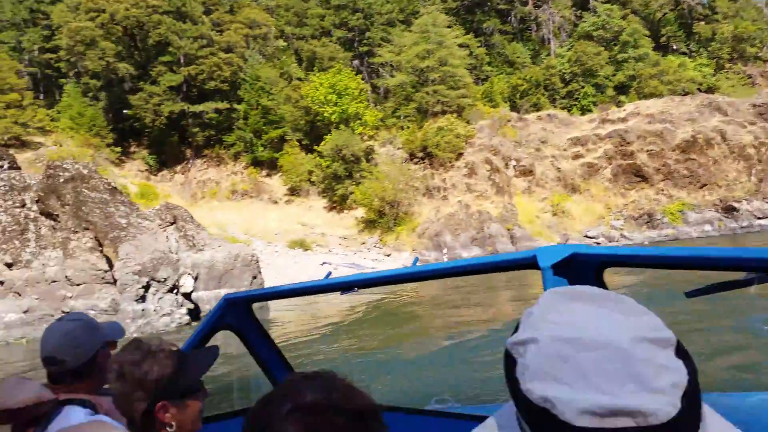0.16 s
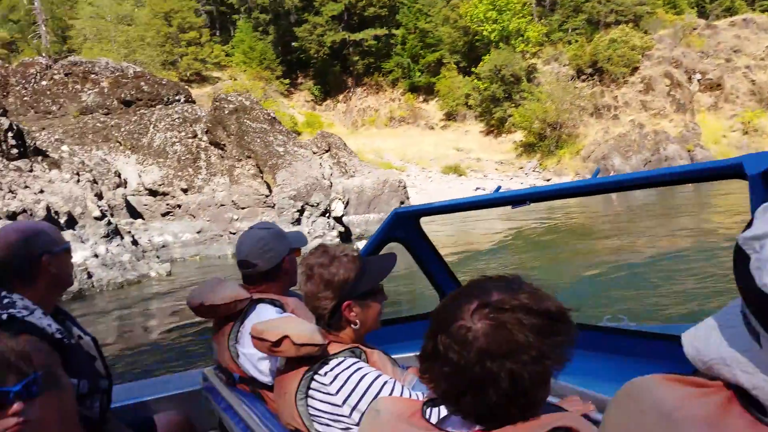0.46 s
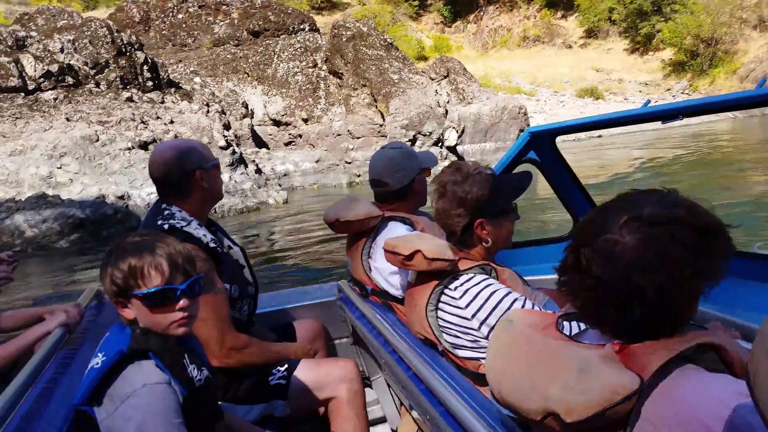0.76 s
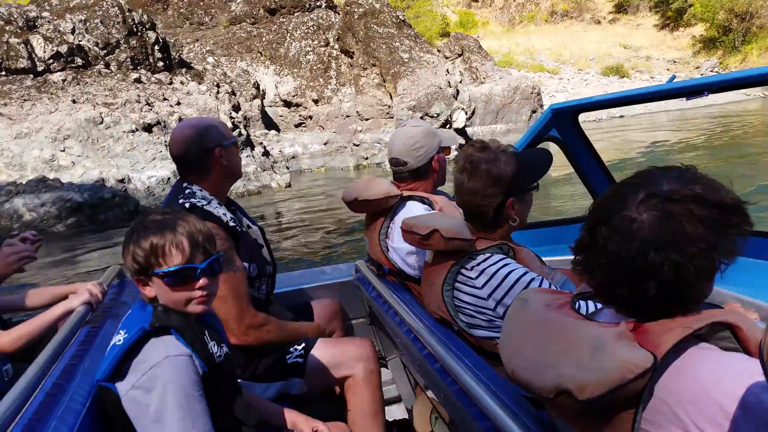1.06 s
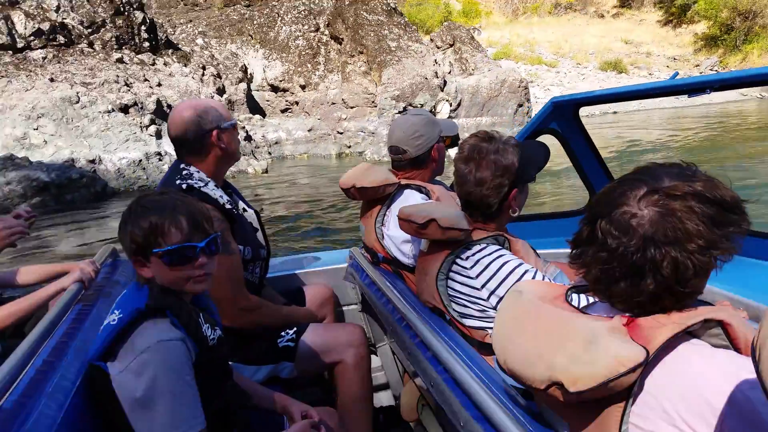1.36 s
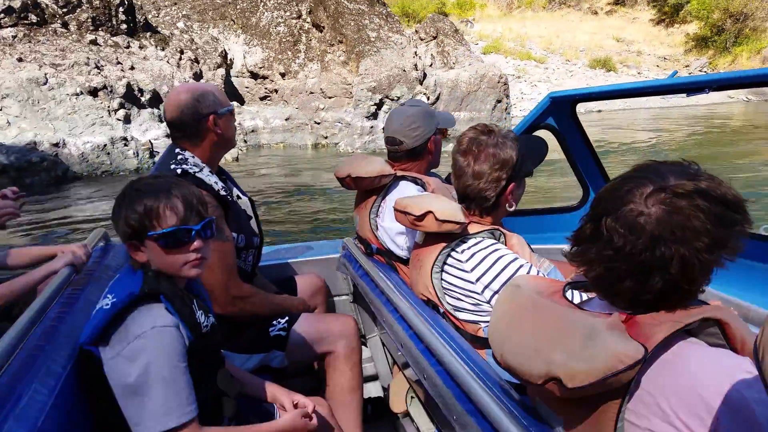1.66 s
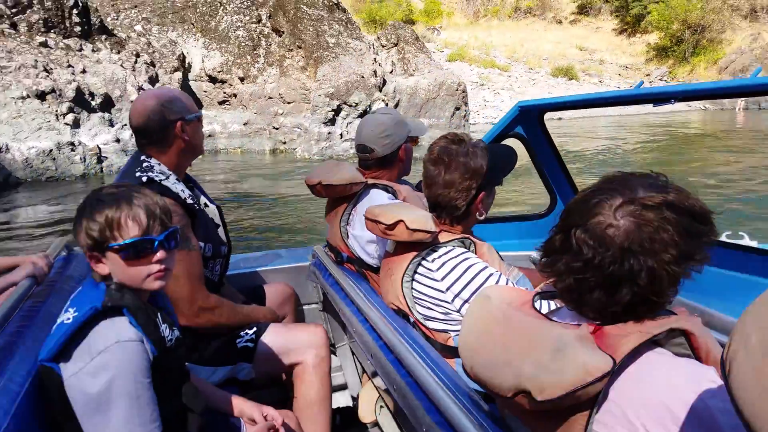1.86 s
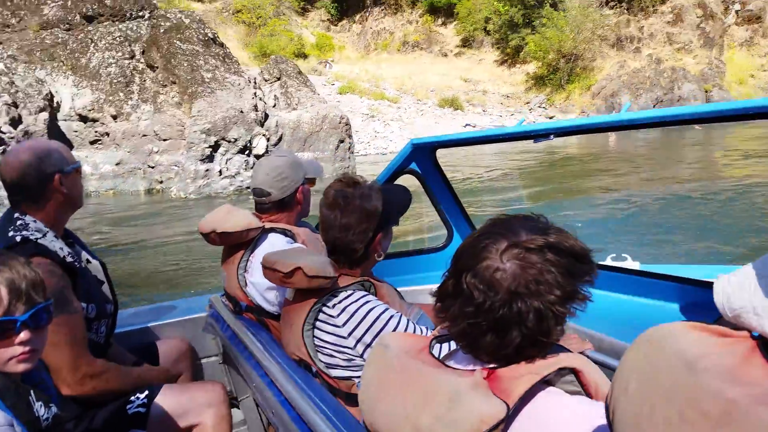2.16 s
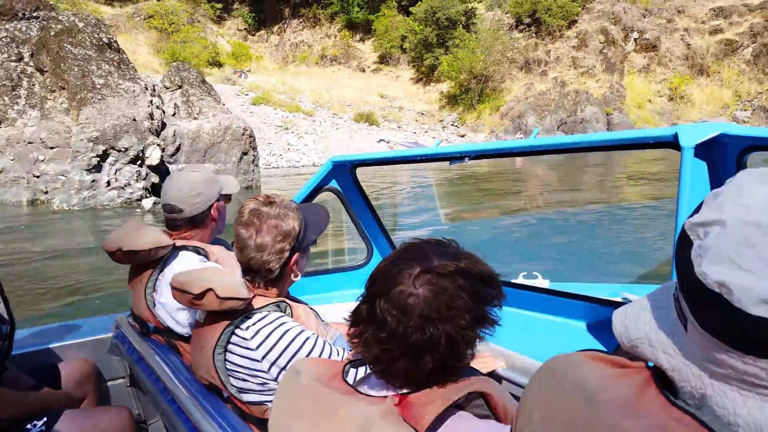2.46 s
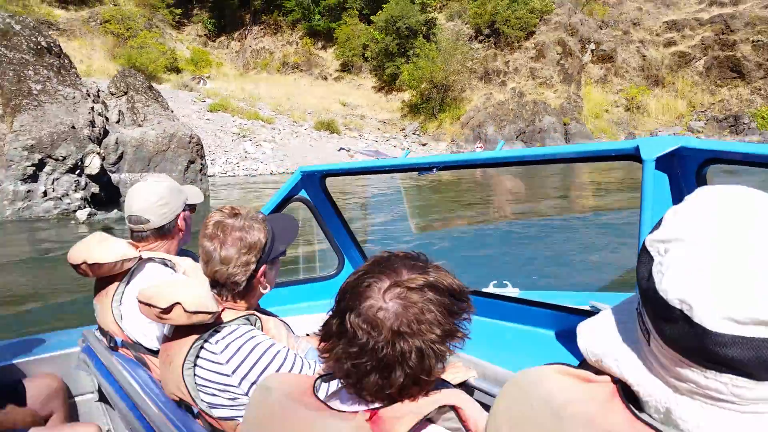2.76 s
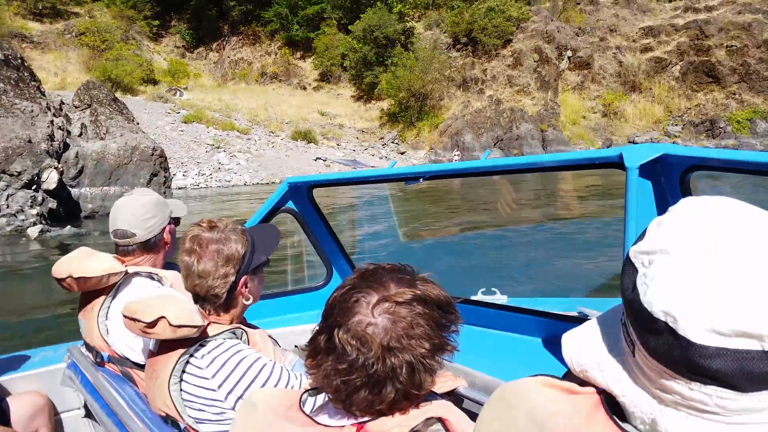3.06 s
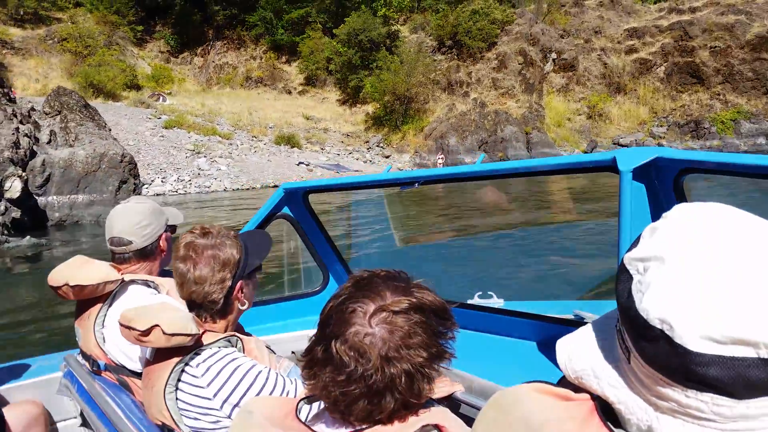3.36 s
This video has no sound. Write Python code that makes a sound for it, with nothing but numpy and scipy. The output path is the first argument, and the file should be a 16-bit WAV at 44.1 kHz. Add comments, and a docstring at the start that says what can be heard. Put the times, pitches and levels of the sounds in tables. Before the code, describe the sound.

A low, burbling boat engine drone runs throughout and creeps up in pitch. Beneath it, heard from on board, river water washes past and spray fizzes, softening gradually, while small waves splash lightly against the hull in the first half.

```python
"""A throbbing engine drone with rushing water and a fine fizz, heard on a jet boat going down a river.
Three eight-cylinder engines run at slightly different, slowly rising speeds, so their tones beat
against each other while uneven firings make the exhausts burble. Water rushes along the hull and
spray hisses, both easing off little by little, and a few small waves splash against the boat."""
import sys
import numpy as np
from scipy import signal
from scipy.fft import rfft, irfft
from scipy.io import wavfile

SR = 44100
rng = np.random.default_rng(int(sys.argv[2]) if len(sys.argv) > 2 else 0)


def dump_mix(stems):
    """Bounce the given channels to the path in sys.argv[1] as a 16-bit WAV at rate SR."""
    frames = np.atleast_2d(stems).T  # one column per channel
    limited = np.clip(frames, -1, 1)  # hard clip at full scale
    pcm = np.round(limited * 32767).astype(np.int16)
    wavfile.write(sys.argv[1], SR, pcm)


N = 154350
TIME = np.arange(N) / SR


def engines():
    """Three engines at nearly the same pitch drift in and out of step, which makes them throb."""
    # each engine's firing tone: t/s, f/Hz, relative level/dB
    fast = [(0.0, 123.0, -18), (0.35, 126.5, -17), (0.8, 126.9, -17), (1.1, 129.1, -16), (1.35, 131.1, -12),
            (1.6, 133.4, -17), (1.9, 133.7, -19), (2.2, 132.1, -20), (2.5, 133.5, -14), (2.8, 133.4, -14),
            (3.1, 134.1, -16), (3.5, 135.7, -14)]
    middle = [(0.0, 122.2, -23), (0.35, 121.3, -21), (0.8, 120.2, -22), (1.1, 121.9, -25),
              (1.35, 124.8, -23), (1.6, 126.9, -20), (1.9, 128.7, -18), (2.2, 128.9, -18),
              (2.5, 131.5, -20), (2.8, 130.3, -19), (3.1, 133.3, -21), (3.5, 134.7, -21)]
    slow = [(0.0, 114.4, -21), (0.35, 111.9, -23), (0.8, 111.8, -19), (1.1, 111.6, -18), (1.35, 113.4, -22),
            (1.6, 112.9, -20), (1.9, 112.2, -18), (2.2, 113.7, -20), (2.5, 114.0, -18), (2.8, 116.8, -17),
            (3.1, 118.5, -19), (3.5, 122.0, -20)]
    # tones at 3-7 (boom) and 9-20 (growl) times the cycle rate: relative level/dB for fast, middle, slow
    boom_tones = [(-32.5, -41.5, -49), (-40, -46, -45.5), (-35.5, -25, -43.5), (-38.5, -39.5, -43),
                  (-41.5, -31, -40.5)]
    growl_tones = [(-37, -41.5, -38.5), (-31, -34.5, -41.5), (-33.5, -33, -43), (-38, -44.5, -41),
                   (-43, -35, -42.5), (-43, -51, -44), (-42, -45.5, -43), (-38, -47.5, -37),
                   (-50, -56, -50.5), (-43, -49.5, -46.5), (-46, -52, -49), (-54, -47.5, -55)]
    # how boom and growl swell and sink: t/s, gain/dB
    boom_gain = [(0, -1), (.25, -0.5), (.5, -5), (.7, 0), (.88, 0.5), (1.15, 0.5), (1.35, -3), (1.7, -1),
                 (2.1, 2), (2.6, -2), (2.9, -2), (3.35, 4.5), (3.5, 4)]
    growl_gain = [(0, 1), (.22, -3.5), (.41, 3.5), (.54, -4.5), (.78, 0.5), (1.4, -1), (1.65, 0.5),
                  (2.2, -0.5), (2.45, -0.5), (2.75, -1.5), (2.95, -4.5), (3.15, 2.5), (3.5, 0)]
    each = zip((fast, middle, slow), np.transpose(boom_tones), np.transpose(growl_tones))
    tone, boom, growl, kicks = np.sum([engine(*one) for one in each], axis=0)
    drone = tone + loudness(boom_gain) * boom + loudness(growl_gain) * (growl + exhaust_burble(kicks))
    right_louder_db, right_later_s = 2.13, 0.00034
    delayed = np.interp(TIME - right_later_s, TIME, drone)
    return np.array([from_db(-right_louder_db / 2) * drone, from_db(right_louder_db / 2) * delayed])


def engine(curve, boom_db, growl_db):
    """One engine: a firing tone, a low boom, a higher growl and a kick of random strength per firing."""
    firing_hz, tone_db = in_time(curve)
    firings = np.cumsum(firing_hz) / SR
    lift_db, waver_db = 0.7, 0.43
    tone = np.sqrt(2) * from_db(tone_db + lift_db + waver_db * drift(13)) * np.cos(2 * np.pi * firings)
    kicks = np.diff(np.floor(firings), prepend=0) * rng.standard_normal(N)
    boom = overtones(firing_hz, boom_db, first_multiple=3)
    growl = overtones(firing_hz, growl_db, first_multiple=9)
    return tone, boom, growl, kicks


def overtones(firing_hz, levels_db, first_multiple):
    """Unequal cylinders add wavering tones at multiples of the rate of the full engine cycle."""
    cylinders, waver_depth, waver_per_s = 8, 0.18, 2.4
    hull_hz, hull_width_hz, hull_boost_db = 221.4, 15, 8.5  # the hull rings here, so passing tones swell
    tones = 0
    for multiple, db in enumerate(levels_db, start=first_multiple):
        hz = multiple * firing_hz / cylinders
        angle = 2 * np.pi * (np.cumsum(hz) / SR + rng.random())
        hull_db = hull_boost_db / (1 + (2 * (hz - hull_hz) / hull_width_hz) ** 2)
        waver = 1 + waver_depth * (drift(waver_per_s) + 1j * drift(waver_per_s))
        tones = tones + from_db(db + hull_db) * np.real(waver * np.exp(1j * angle))
    return np.sqrt(2) * tones


def exhaust_burble(kicks):
    """The uneven kicks of the firings set the exhausts and the hull ringing."""
    # pitches at which they ring: f/Hz, width/Hz, relative level/dB
    resonances = [(49, 7, -9.5), (82, 29, -3.5), (110, 18, 0), (154, 17, -3.5), (176, 49, -5),
                  (207, 14, -5.5), (293, 33, -14), (370, 230, -24)]
    ringing = sum(from_db(db) * resonate(kicks, hz, width) for hz, width, db in resonances)
    low_band = signal.butter(2, [45, 420], "band", fs=SR, output="sos")
    return from_db(-26.5) * rms_one(signal.sosfilt(low_band, ringing))


def water():
    """The hull rumbles, water washes along it and the bow wave breaks into bright foam."""
    # tone colour of each noise: f/Hz, relative level/dB
    rumble_colour = [(15, -17.5), (30, -11), (60, -5), (120, 0), (230, -3.5), (330, -3.5), (450, -12),
                     (700, -13.5), (1200, -33.5), (2500, -61.5)]
    wash_colour = [(100, -12), (400, -3), (750, -0.5), (1000, -2.5), (1400, -6), (2000, -7.5), (2600, -13),
                   (3300, -21), (4200, -23.5), (5500, -31), (7000, -37), (12000, -58)]
    foam_colour = [(1200, -25), (2000, -5), (2700, 1), (3300, -2), (4200, -12), (5500, -19), (7000, -28),
                   (10000, -51)]
    # how loud each one is: t/s, level/dB
    rumble_level = [(0, -28.5), (.4, -32.5), (.58, -28), (.68, -32), (.85, -30.5), (1.1, -31.5), (1.5, -32),
                    (2.4, -34), (2.9, -31), (3.05, -30.5), (3.5, -32.5)]
    wash_level = [(0, -37), (.35, -37), (.7, -39.5), (1.35, -40.5), (1.5, -40.5), (1.7, -40.5), (1.95, -42),
                  (2.38, -40), (2.55, -42.5), (2.8, -41.5), (3.15, -42.5), (3.5, -40)]
    foam_level = [(0, -52.5), (.4, -56), (.7, -51), (1.35, -50), (1.65, -52.5), (2.0, -57), (2.38, -53.5),
                  (2.6, -60), (3.5, -57.5)]
    rumble = loudness(rumble_level) * turbulence(rumble_colour, flicker_db=1.66, flicker_per_s=14)
    wash = loudness(wash_level) * turbulence(wash_colour, flicker_db=0.85, flicker_per_s=13)
    foam = loudness(foam_level) * turbulence(foam_colour, flicker_db=1.5, flicker_per_s=13)
    return rumble + wash + foam


def turbulence(spectrum, flicker_db, flicker_per_s):
    """Churning water: stereo noise in which each octave swells and sinks on its own."""
    # how alike left and right are: f/Hz, likeness (1 or more = the same, -1 or less = opposite)
    likeness = [(60, 1), (200, -1.5), (350, 1), (550, 0.74), (1000, -0.09), (1600, -0.24), (2500, 0.18),
                (5000, 0)]
    alike = np.clip(per_bin(likeness), -1, 1)
    mid, side = rfft(rng.standard_normal((2, N)))
    stereo = np.sqrt(1 + alike) * mid + np.sqrt(1 - alike) * side * [[1], [-1]]
    shaped = stereo * from_db(per_bin(spectrum))
    octave = np.log2(np.clip(np.fft.rfftfreq(N, 1 / SR), 100, 6000)).round()
    bands = [irfft(shaped * (octave == k), N) for k in np.unique(octave)]
    return rms_one(sum(band * from_db(flicker_db * drift(flicker_per_s)) for band in bands))


def hollow_swell():
    """A narrow band of the rumble wells up for a moment and sounds hollow."""
    peak_s, spread_s, hz, width_hz = .775, .05, 432, 42
    band = resonate(resonate(rng.standard_normal(N), hz, width_hz), hz, width_hz)
    return from_db(-33) * np.exp(-((TIME - peak_s) / spread_s) ** 2) * rms_one(band)


def spray():
    """Fine spray hisses and single drops tick, differently on the left and the right."""
    # tone colour on each side: f/Hz, relative level/dB
    left_colour = [(4000, -36), (7500, -25), (8500, -8.5), (9200, -5.5), (9850, -0.5), (10800, -4.5),
                   (12500, -7), (14500, -13)]
    right_colour = [(4000, -41), (8500, -30), (9600, -17), (11000, -6.5), (12500, -6), (14400, 0.5)]
    # how loud the spray is: t/s, level/dB
    spray_level = [(0, -44.5), (.15, -49), (.4, -46.5), (.6, -48.5), (1.0, -48), (1.35, -46.5),
                   (1.65, -47.5), (1.97, -51.5), (2.38, -49.5), (2.6, -53.5), (3.05, -54), (3.5, -54)]
    drops_per_s, drops_db = 900, -8.5
    sizes = from_db(3.5 * np.minimum(rng.exponential(1, (2, N)), 5)) * rng.choice([-1, 1], (2, N))
    drops = rms_one(sizes * (rng.random((2, N)) < drops_per_s / SR))
    left, right = rng.standard_normal((2, N)) + from_db(drops_db) * drops
    level = loudness(spray_level) * from_db(.6 * drift(15))
    return level * np.array([colour(left, left_colour), colour(right, right_colour)])


def splashes():
    """Small waves break on the hull in short, bright bursts."""
    # one row per splash: t/s, level/dB, decay/s
    bursts = [(.19, -57, .06), (.372, -52, .012), (.828, -55.5, .012), (1.071, -59, .03),
              (1.265, -54, 0.036), (1.8, -53, 0.051)]
    # their tone colour: f/Hz, relative level/dB
    splash_colour = [(1500, -12.5), (3200, -0.5), (5300, -0.5), (7000, -9), (10000, -4.5), (14500, -7.5)]
    rise_s = .006
    level = sum(from_db(db) * np.exp(-np.abs(TIME - peak_s) / np.where(TIME < peak_s, rise_s, decay_s))
                for peak_s, db, decay_s in bursts)
    return level * colour(rng.standard_normal((2, N)), splash_colour)


def from_db(db):
    """Turn decibels into a factor to multiply by."""
    return 10 ** (np.asarray(db) / 20)


def rms_one(x):
    """Scale a sound to an average power of 1."""
    return x / np.sqrt(np.mean(x ** 2) + 1e-20)


def in_time(rows):
    """Read each column of a time table at every sample."""
    times, *columns = np.transpose(rows)
    return [np.interp(TIME, times, column) for column in columns]


def loudness(rows):
    """Turn rows of t/s, level/dB into a factor for every sample."""
    return from_db(in_time(rows)[0])


def per_bin(points):
    """Read a frequency table at every step (bin) of the spectrum."""
    hz, value = np.transpose(points)
    return np.interp(np.log(np.fft.rfftfreq(N, 1 / SR) + 1), np.log(hz), value)


def colour(x, spectrum):
    """Give a sound a tone colour, at a power of 1."""
    return rms_one(irfft(rfft(x) * from_db(per_bin(spectrum)), N))


def drift(rate):
    """A slow random wander, about 1 in size; a higher rate wanders faster."""
    step, warm_up = 100, 1000
    r = np.exp(-2 * np.pi * step * rate / SR)
    slow = signal.lfilter([1], [1, -2 * r, r * r], rng.standard_normal(N // step + warm_up + 2))[warm_up:]
    return np.interp(np.arange(N) / step, np.arange(len(slow)), rms_one(slow))


def resonate(x, hz, width_hz):
    """Let a sound ring at one pitch and weaken the rest."""
    r = np.exp(-np.pi * width_hz / SR)
    feedback = [1, -2 * r * np.cos(2 * np.pi * hz / SR), r * r]
    return signal.lfilter(np.array([1, 0, -1]) * (1 - r * r) / 2, feedback, x)


def scene():
    """Engines and water as heard from a passenger seat."""
    return engines() + water() + spray() + splashes() + hollow_swell()


def record(dry):
    """The sound starts softly, the microphones are deaf to one treble band and the very top is cut."""
    fade_s, deaf_band_hz, top_hz = .004, [5680, 7800], 14600
    faded = dry * np.sin(np.pi / 2 * np.minimum(TIME / fade_s, 1)) ** 2
    notched = signal.sosfilt(signal.butter(2, deaf_band_hz, "bandstop", fs=SR, output="sos"), faded)
    return signal.sosfilt(signal.ellip(12, .2, 80, top_hz, fs=SR, output="sos"), notched)


dry = scene()
out = record(dry)
dump_mix(out)
```